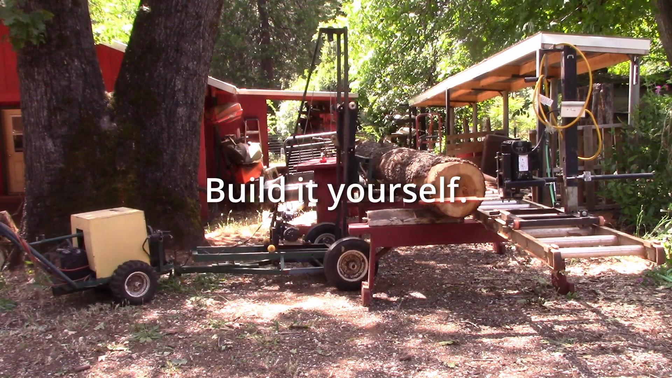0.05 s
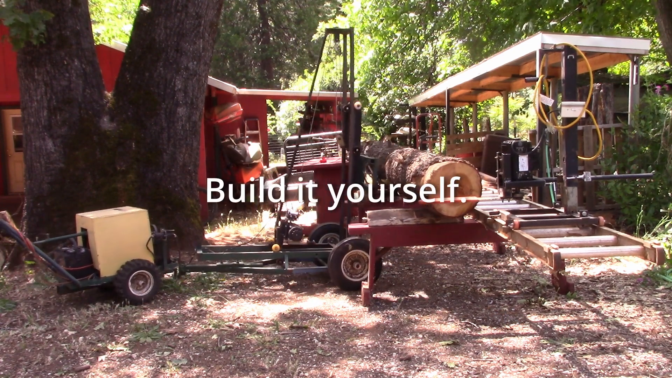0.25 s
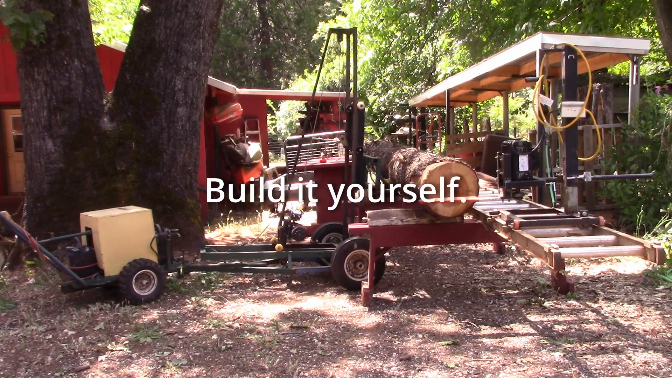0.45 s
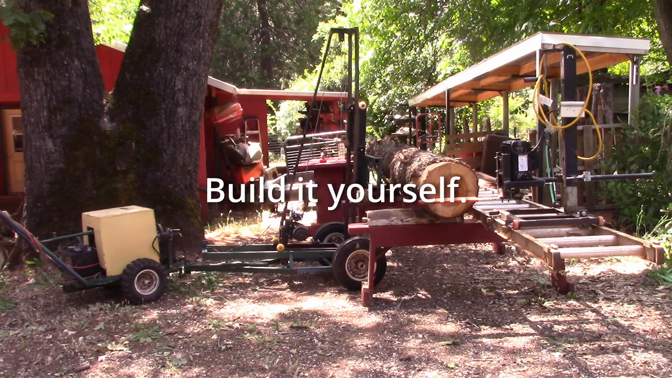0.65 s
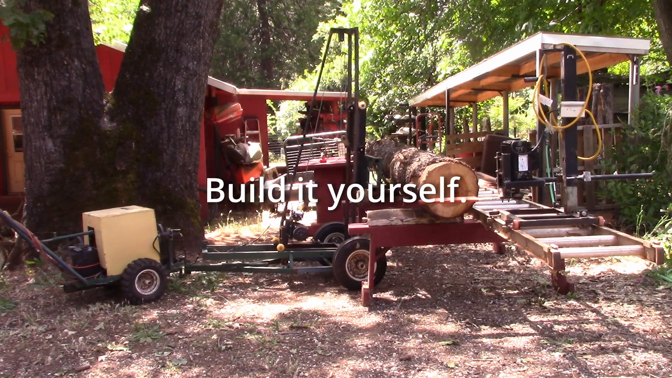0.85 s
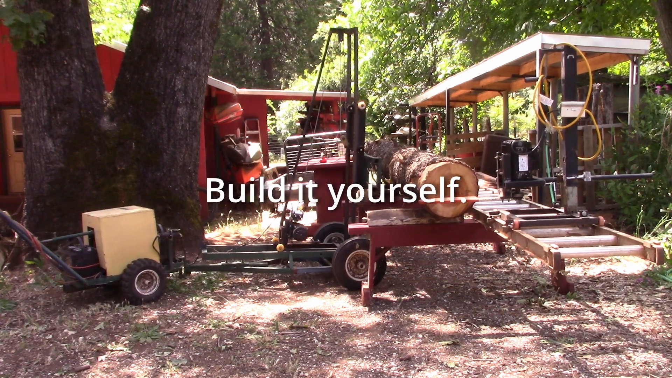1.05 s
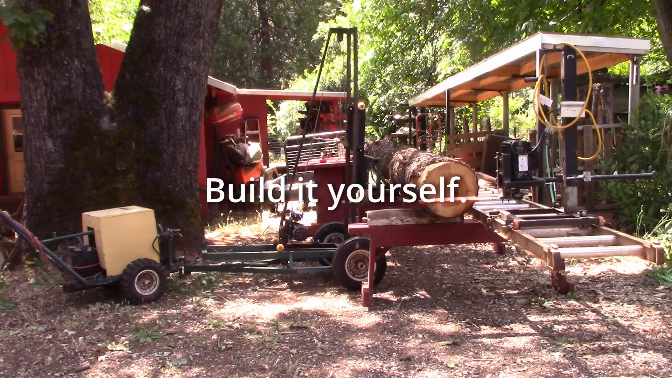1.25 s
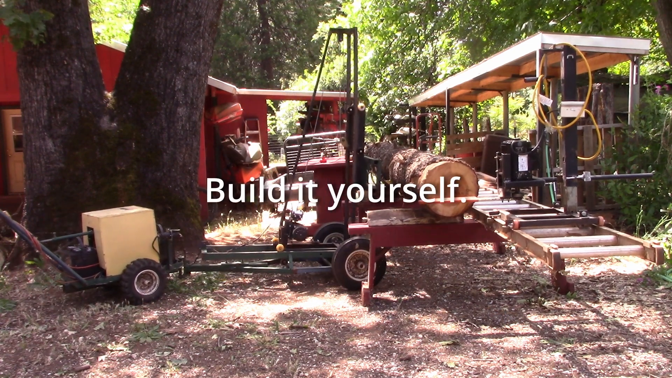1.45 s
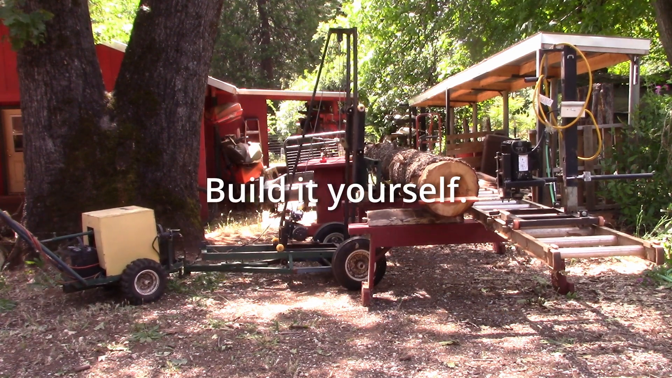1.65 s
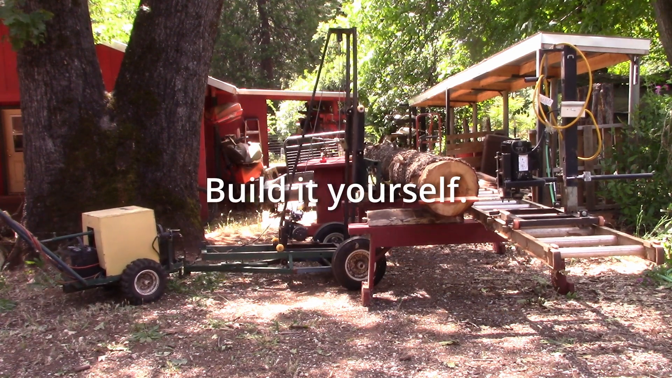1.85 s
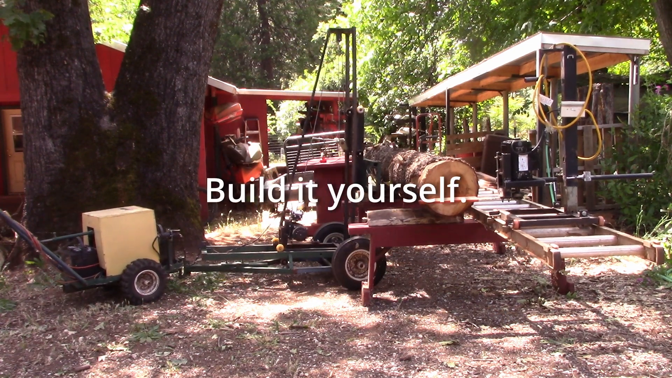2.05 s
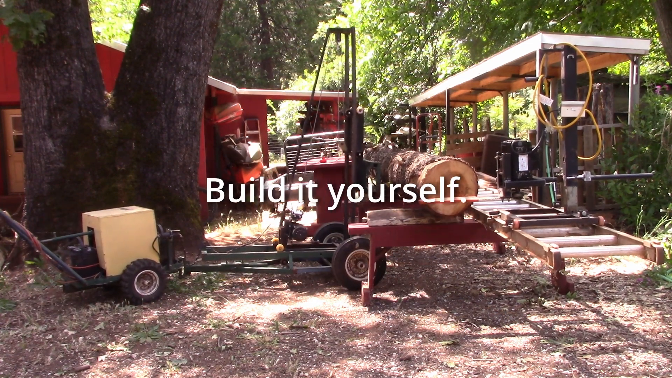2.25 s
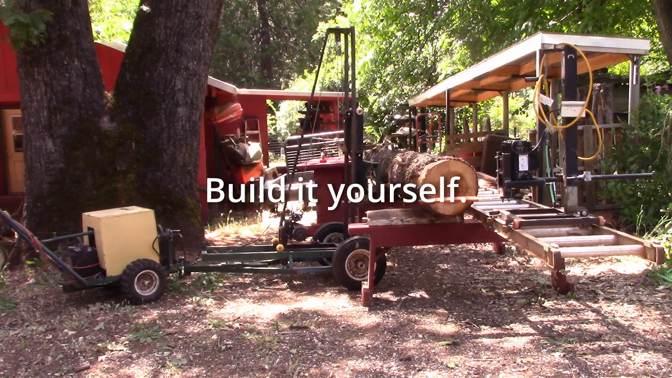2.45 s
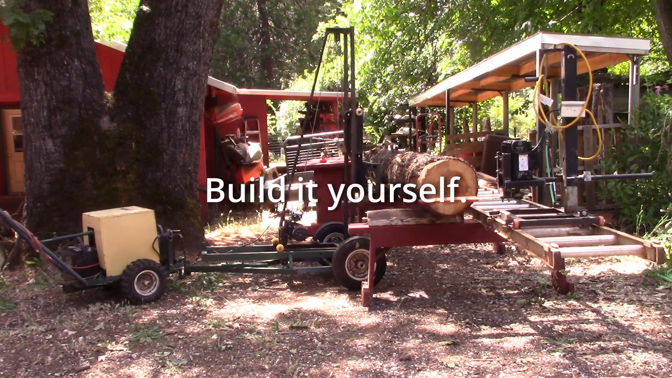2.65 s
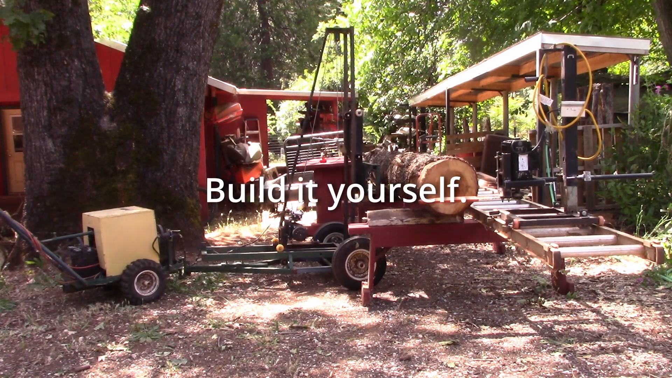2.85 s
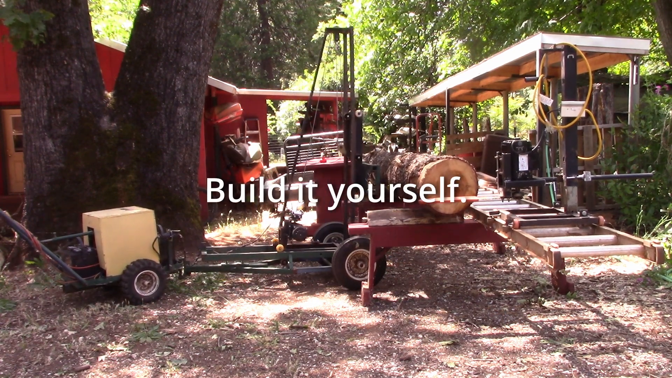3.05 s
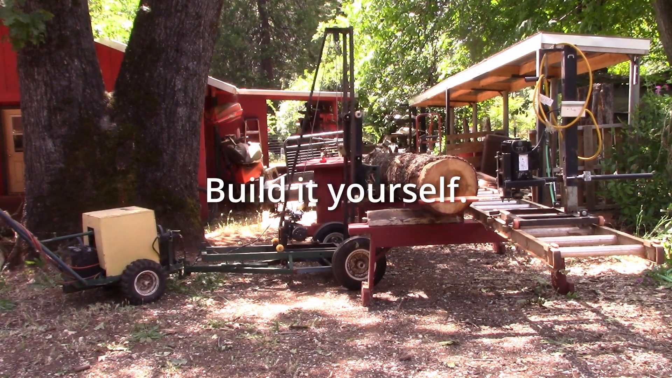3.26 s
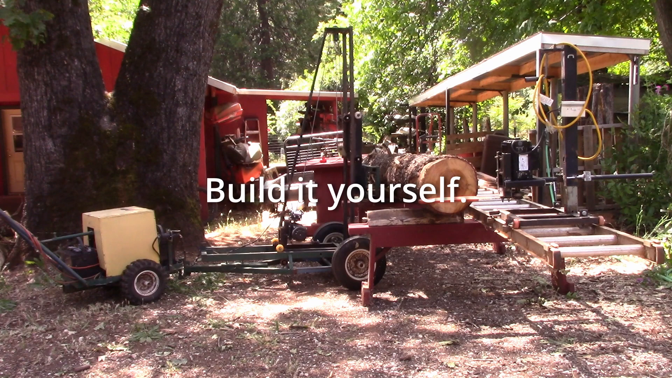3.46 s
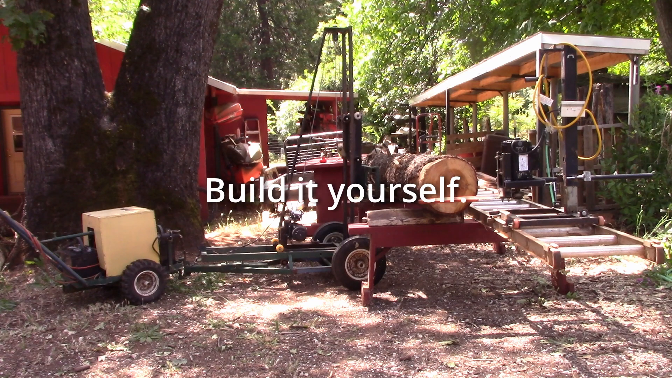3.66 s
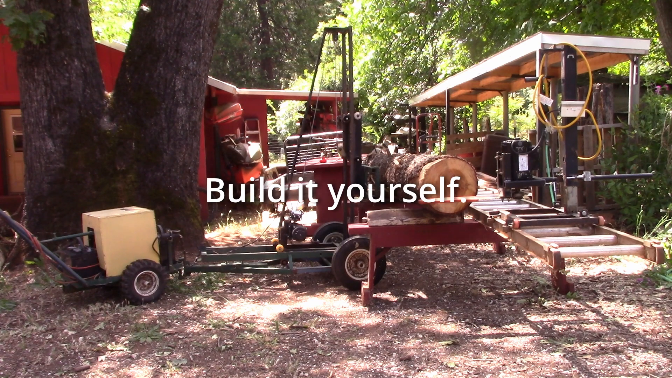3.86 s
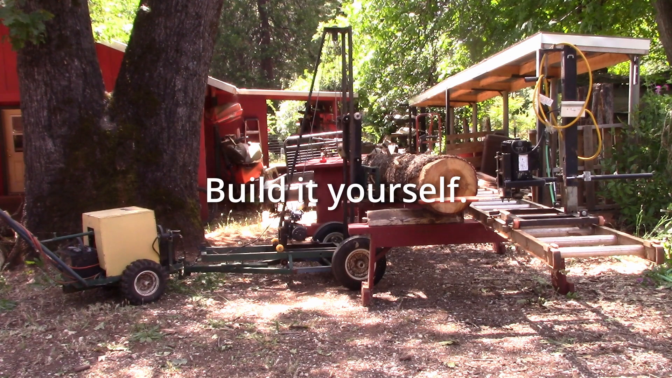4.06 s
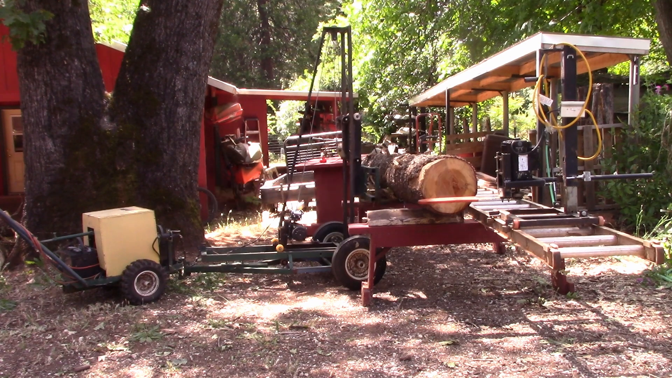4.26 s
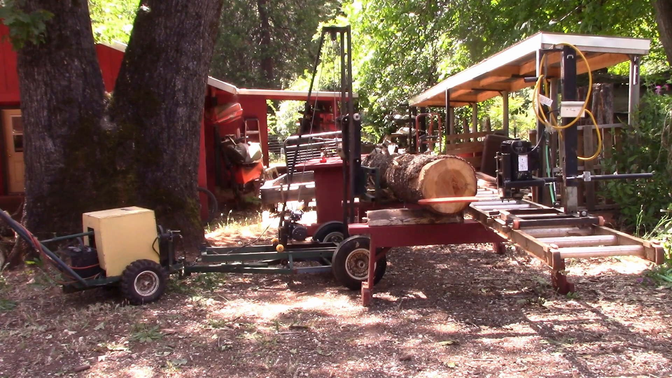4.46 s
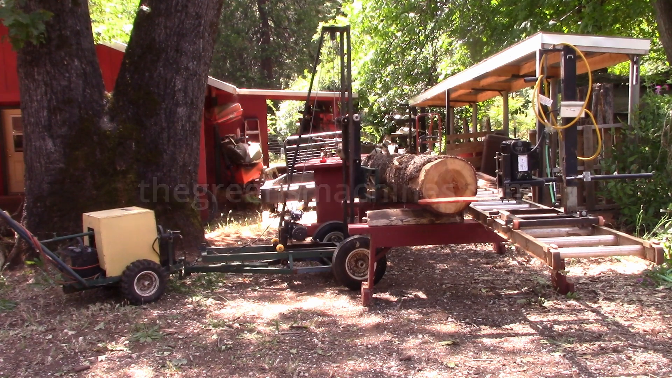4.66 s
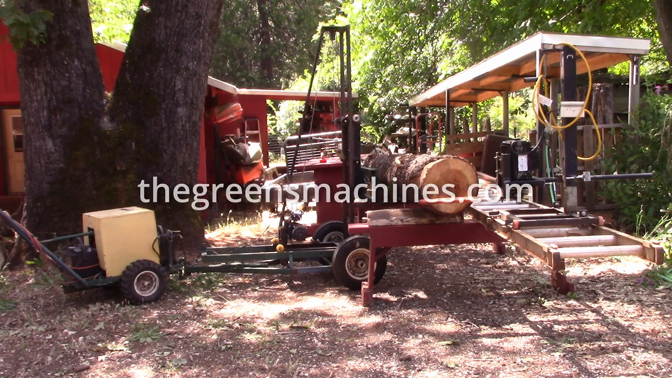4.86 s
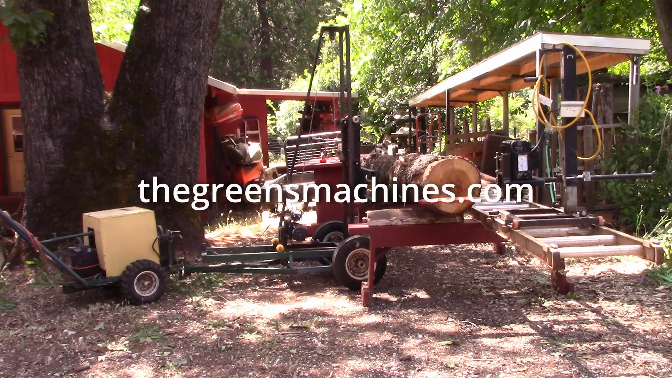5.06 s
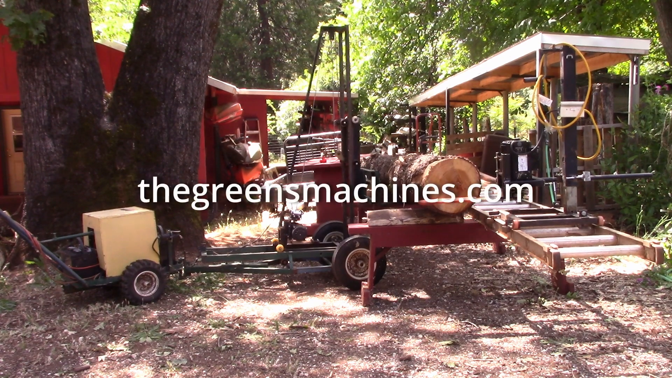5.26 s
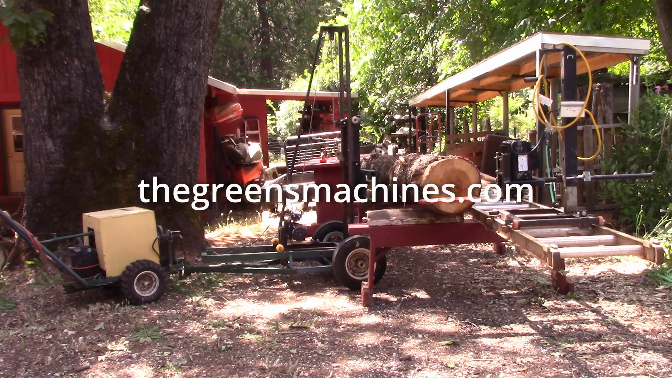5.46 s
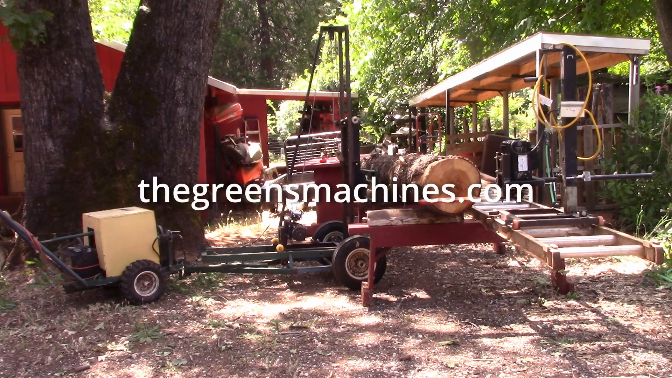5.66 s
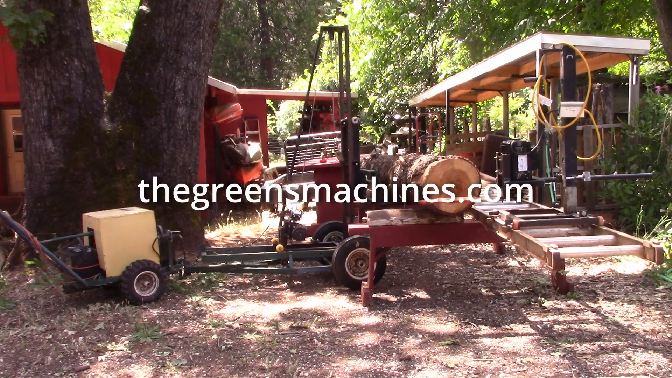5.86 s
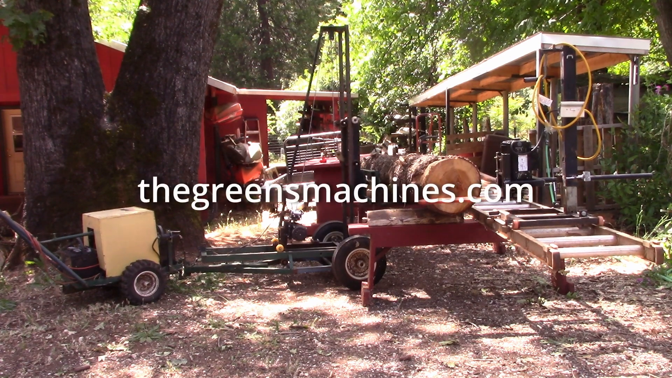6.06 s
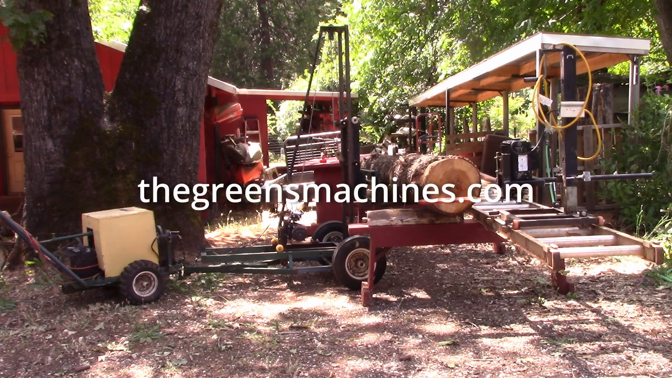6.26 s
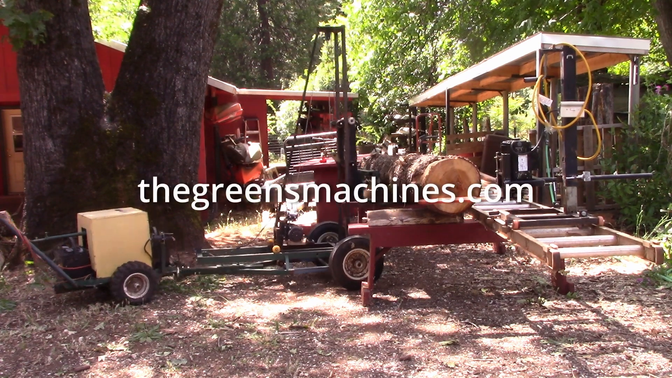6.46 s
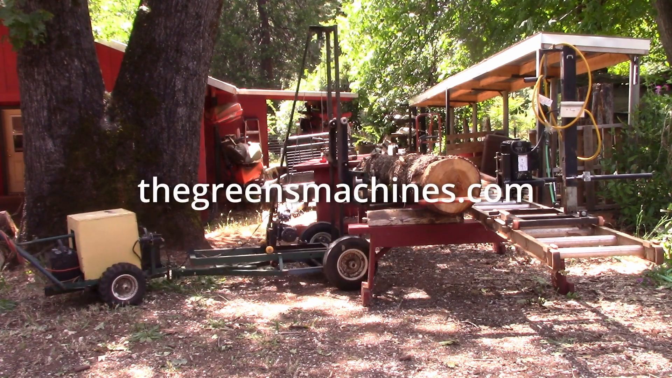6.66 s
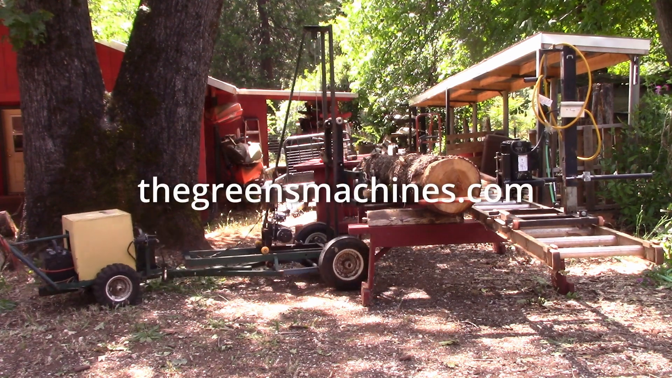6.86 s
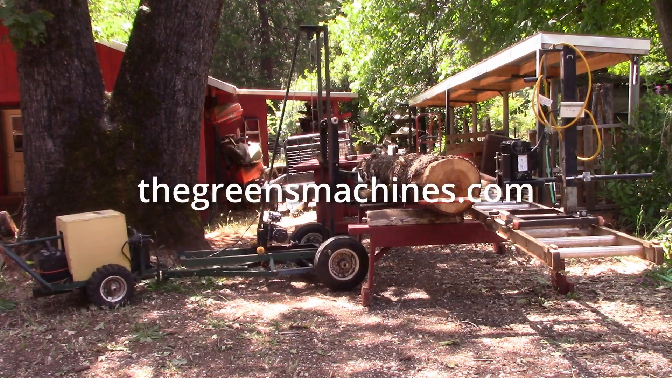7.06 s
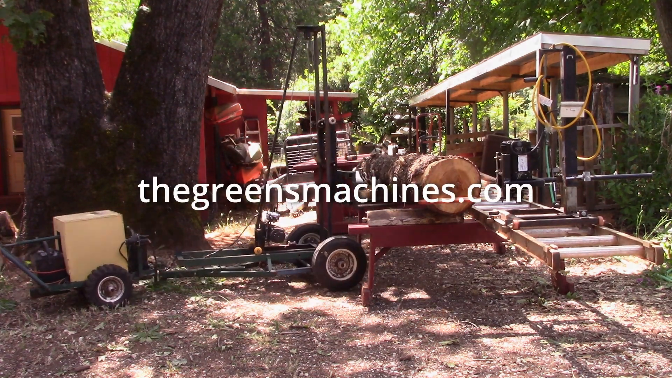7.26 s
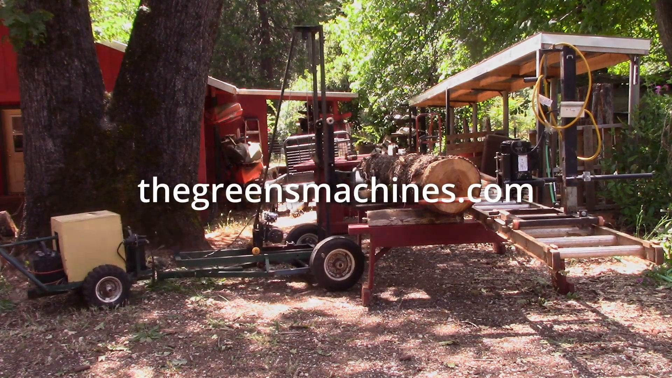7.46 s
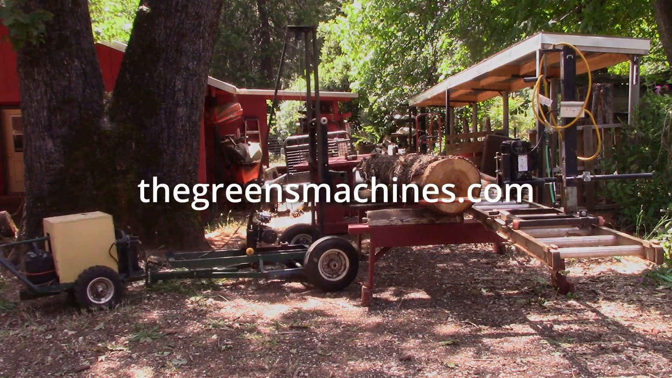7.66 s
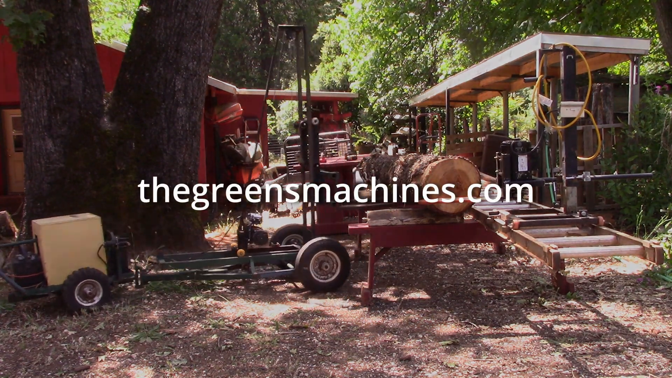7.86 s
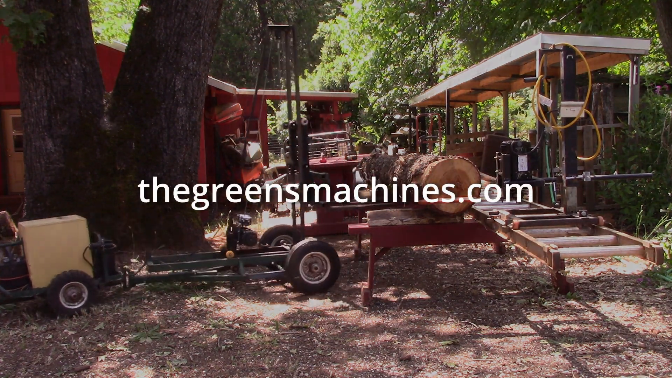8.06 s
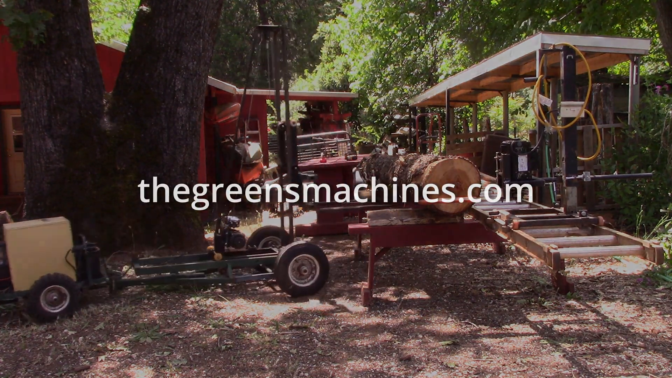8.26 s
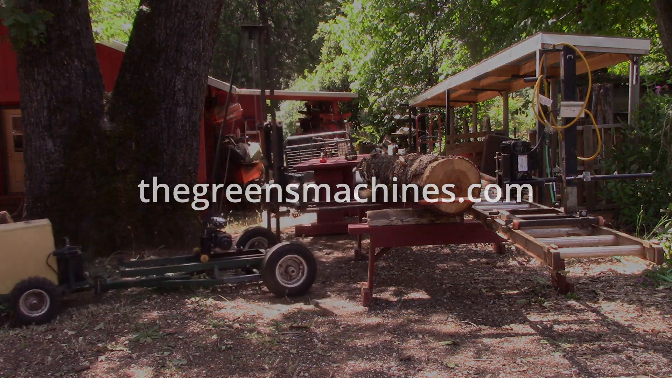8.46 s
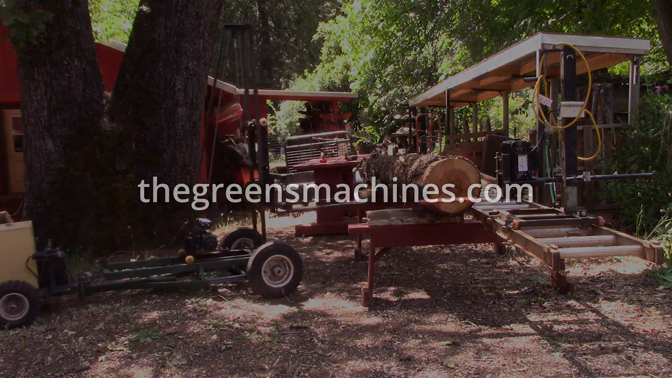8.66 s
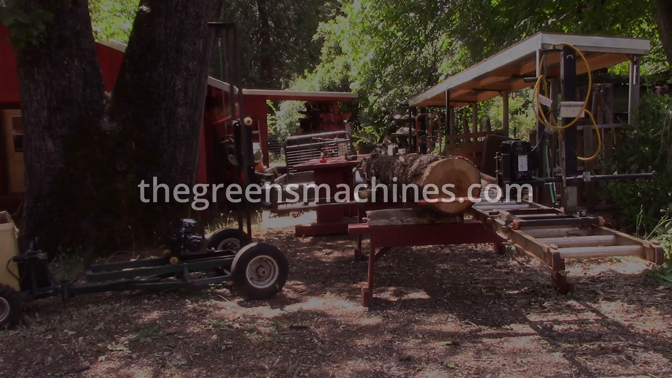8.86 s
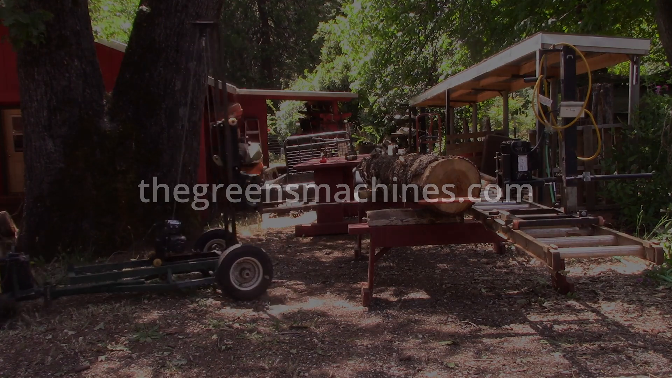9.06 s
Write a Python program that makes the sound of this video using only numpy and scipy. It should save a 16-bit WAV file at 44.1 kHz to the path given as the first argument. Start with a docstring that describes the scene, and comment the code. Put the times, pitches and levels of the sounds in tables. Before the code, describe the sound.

A small electric log carrier drones to a stop on crackling leaf litter a few metres away. Its lift runs twice with a rasping whine, among sharp little snaps and a few wooden bumps from the log. The brake clacks off, steel parts clatter loudly and the carrier backs away. After another clack it speeds up, its gears humming and hissing at a rising pitch. The yard is otherwise quiet.

```python
"""A wooded yard, an electric log carrier a few metres away. It rolls to a stop on crackling leaf
litter. The lift runs twice: strokes and rubbing ring its housing in a rasping whine, the log bumps.
The brake clacks off and the carrier backs away with a steel clatter, then speeds up. Its gear teeth
shake the frame and hiss; the shaft's tones sing out with speed."""
import sys
import numpy as np
from scipy import signal
from scipy.fft import rfft, irfft, next_fast_len
from scipy.io import wavfile
from scipy.ndimage import uniform_filter1d, map_coordinates

SR = 44100
rng = np.random.default_rng(int(sys.argv[2]) if len(sys.argv) > 2 else 0)


def log_audio(samples):
    """Write samples as a 16-bit WAV file to the path given in sys.argv[1]."""
    # one column per channel
    frames = np.atleast_2d(samples).T
    # limit to full scale, then quantise
    limited = np.clip(frames, -1, 1)
    pcm = np.round(limited * 32767).astype(np.int16)
    wavfile.write(sys.argv[1], SR, pcm)


N = 402175
TIME = np.arange(N) / SR
CRUISE_HZ = 300  # shaft speed

# frame resonances: pitch_hz, width_hz, level_db
FRAME_MODES = [(201, 27.6, -9), (223.5, 29, -2), (267.5, 22, -0.5), (403.7, 50.6, 2), (441, 146, -10.5),
               (514.4, 72, -2.5), (584, 175, -8.5), (678, 40, -8), (880, 68, -14), (1013, 78, -14.5),
               (1253, 300, -21)]
# spectrum of a small dry crack: freq_hz, level_db
CRACK_SPECTRUM = [(800, 7), (2500, 10), (6000, 2), (9500, 1.5), (12000, -14), (15500, -15)]


def amp(db):
    """Decibels to gain."""
    return 10 ** (np.asarray(db) / 20)


def unit(x):
    """Scales to rms 1."""
    return x / np.sqrt(np.mean(x ** 2) + 1e-20)


def bell(x, centre, span):
    """Smooth hump of height 1."""
    return np.exp(-((x - centre) / span) ** 2)


def add(mix, start_s, sound):
    """Lays a sound into the mix."""
    part = mix[max(round(start_s * SR), 0):][:len(sound)]
    part += sound[:len(part)]


def colour(x, spectrum):
    """Filters by (freq_hz, level_db) points, falling away past the ends; rms 1."""
    size = next_fast_len(len(x))
    octave = np.log2(np.fft.rfftfreq(size, 1 / SR) + 1)
    hz, db = np.transpose(spectrum)
    outside_oct = abs(octave - np.clip(octave, np.log2(hz[0]), np.log2(hz[-1])))
    gain = amp(np.interp(octave, np.log2(hz), db) - 6.9 * outside_oct)
    return unit(irfft(rfft(x, size) * gain, size)[:len(x)])


def drift(rate_hz):
    """Smooth random motion up to about rate_hz; rms 1."""
    size = next_fast_len(N)
    hz = np.fft.rfftfreq(size, 1 / SR)
    return unit(irfft(rfft(rng.standard_normal(size)) * np.exp(-(hz / rate_hz) ** 2), size)[:N])


def ring(x, modes):
    """Steep resonances (pitch_hz, width_hz, level_db) that ring on after each push; rms 1."""
    size = next_fast_len(N)
    freq_hz = abs(np.fft.fftfreq(size, 1 / SR))
    power = sum(amp(2 * db) / (1 + (2 * (freq_hz - hz) / width_hz) ** 2) ** 2
                for hz, width_hz, db in modes)
    minimum_phase = np.exp(signal.hilbert(np.log(power + 1e-12) / 2).conj())
    return unit(np.fft.ifft(np.fft.fft(x, size) * minimum_phase).real[:N])


def grains(per_s, spread_db):
    """Random impacts of uneven size; rms 1."""
    size = amp(spread_db * np.minimum(rng.exponential(1, N), 4))
    return unit(size * rng.choice([-1, 1], N) * (rng.random(N) < per_s / SR))


def burst(spectrum, t60_s, rise_s, tail_db, tail_t60_s, chatter_db=0):
    """Struck body with dense modes: a quick ring and a weaker, longer one."""
    t = np.arange(SR) / SR
    chatter = unit(amp(chatter_db * unit(uniform_filter1d(rng.standard_normal(SR), size=120))))
    decay = chatter * amp(-60 * t / t60_s) + amp(tail_db - 60 * t / tail_t60_s)
    return colour(rng.standard_normal(SR), spectrum) * decay * (1 - np.exp(-t / rise_s))


def chime(modes, rise_s=0.0015):
    """Struck metal: each mode dies at its own rate."""
    t = np.arange(SR) / SR
    tones = sum(amp(db - 60 * t / t60_s) * np.sin(2 * np.pi * (hz * t + rng.random()))
                for hz, db, t60_s in modes)
    return tones * (1 - np.exp(-t / rise_s))


def swell(start_s, stop_s, db, rise_s, fall_db_per_s=215):
    """Gain that rises, holds and runs down."""
    rise = np.clip((TIME - start_s) / rise_s, 0, 1)
    return rise * amp(db - fall_db_per_s * np.maximum(TIME - stop_s, 0))


def by_speed(speed_hz, knee_hz, knee_db, db_per_hz):
    """Gain against shaft speed, with slopes (below, above) the knee."""
    return amp(knee_db + np.where(speed_hz < knee_hz, *db_per_hz) * (speed_hz - knee_hz))


def shaft_speed_hz():
    """Drive motor speed; zero while the lift works."""
    # three moves: time_s, speed_hz
    roll_in = [(0, 229), (.28, 221.1), (.5, 173), (.62, 135), (.75, 103), (.92, 40.13)]
    back_off = [(6.11, 60), (6.159, 188.2), (6.22, 226), (6.5, 240), (6.721, 232), (6.92, 205), (7.15, 198),
                (7.35, 150)]
    drive_off = [(7.42, 172), (7.5, 219), (7.8, 246.8), (8.1, 283.2), (8.2, 303.5), (8.4, 320.8),
                 (8.6, 326.3), (8.8, 332.6), (9.12, 338)]
    arriving = np.interp(TIME, *np.transpose(roll_in), right=0)
    leaving = np.interp(TIME, *np.transpose(back_off + drive_off), left=0)
    return arriving + leaving


def forest_air():
    """Still air, barely stirring."""
    # air spectrum: freq_hz, level_db
    spectrum = [(15, -66), (25, -47), (49, -19), (69, -5.5), (86, -33), (110, -4), (183, -5.5), (215, 1.5),
                (274, -5.5), (313, -6), (421, -5), (4500, -24), (5140, -24.5), (10900, -35), (15500, -43)]
    stir = amp(0.7 * drift(2))
    return amp(-63) * colour(rng.standard_normal(N), spectrum) * stir


def yard_echoes(x, t60_s):
    """Scattered echoes from trunks and sheds."""
    t = np.arange(SR // 2) / SR
    taps = rng.standard_normal(len(t)) * (rng.random(len(t)) < 2000 / SR)
    taps *= (t > 0.008) * amp(-60 * t / t60_s)
    taps = colour(taps, [(100, -33), (450, -2.5), (2000, 6), (4000, 11.5), (8000, 5), (15000, -43)])
    return signal.fftconvolve(x, taps / np.linalg.norm(taps))[:N]


def panels(x, echo_db, t60_s, count=40):
    """Short reflections in the frame comb the sound; thin steel returns only treble."""
    delay_s = rng.uniform(0.002, 0.05, count)
    taps = np.zeros(SR // 8)
    taps[(delay_s * SR).astype(int)] = rng.choice([-1, 1], count) * amp(-60 * delay_s / t60_s)
    highpass = signal.butter(2, 2200, "high", fs=SR, output="sos")
    taps = signal.sosfilt(highpass, taps / np.linalg.norm(taps))
    return x + amp(echo_db) * signal.fftconvolve(x, taps)[:N]


def ground_thuds():
    """Soft thuds through the ground."""
    # thuds: start_s, level_db, t60_s
    thuds = [(0.625, -56.5, 0.37), (0.787, -53, 0.069), (0.881, -57, 0.091), (.903, -54, 0.085),
             (1.277, -61, 0.14), (2.57, -61, 0.11), (2.749, -62, 0.12), (6.315, -54, 0.065),
             (6.589, -58, 0.47)]
    # ground spectrum: freq_hz, level_db
    ground = [(20, -50), (55, -13), (105, 3.5), (170, -4.5), (280, -4), (450, -33)]
    out = np.zeros(N)
    for start_s, db, t60_s in thuds:
        add(out, start_s, amp(db) * burst(ground, t60_s, rise_s=0.0029, tail_db=-9, tail_t60_s=1))
    return out


def twigs(speed_hz, cruise_per_s=7, shapes=6):
    """Twigs and bark snap; litter crackles under the tyres, denser and harder with speed."""
    # loudest snaps: start_s, level_db
    snaps = [(0.071, -45), (.091, -45), (.115, -51), (.198, -50.5), (.26, -52), (.301, -52), (.368, -48),
             (0.4426, -51), (.455, -48.5), (0.6127, -51), (1.627, -40), (2.815, -39.5), (2.894, -37.5),
             (2.9437, -38), (3.033, -38.5), (3.953, -52), (4.067, -47), (4.3412, -42), (4.7665, -43),
             (5.068, -36), (5.297, -40), (5.457, -38.5)]
    effort = (speed_hz / CRUISE_HZ) ** 4
    hit = rng.random(N) < cruise_per_s * effort / SR
    crackles = list(zip(TIME[hit], -47.5 + 10 * np.log10(effort[hit])))
    clicks = np.zeros((shapes, N))
    for k, (start_s, db) in enumerate(snaps + crackles):
        add(clicks[k % shapes], start_s, amp([db - 2]))
    out = np.zeros(N)
    for row in clicks:
        crack = burst(CRACK_SPECTRUM, t60_s=0.011, rise_s=0.00029,
                      tail_db=-11.5, tail_t60_s=0.11, chatter_db=1.8)
        out += signal.oaconvolve(row, crack)[:N]
    return out


def log_bumps():
    """The log bumps its bed; soft bumps are dull."""
    # bumps: start_s, level_db, t60_s, cutoff_hz
    bumps = [(0.929, -60, 0.15, 1000), (0.955, -50, 0.054, 1300), (2.471, -46, 0.18, 6000),
             (5.068, -46, 0.071, 5900), (5.332, -39, 0.14, 5000), (5.366, -47.5, 0.18, 6000),
             (6.314, -36, 0.022, 4000)]
    # wood spectrum: freq_hz, level_db
    wood = [(130, -16), (250, -8), (390, 6), (620, -3.5), (800, 1), (1450, -2), (2300, -7), (3100, -6.5),
            (5200, -24), (9000, -41)]
    out = np.zeros(N)
    for start_s, db, t60_s, cutoff_hz in bumps:
        dulled = [(hz, band_db - 10 * np.log10(1 + (hz / cutoff_hz) ** 6)) for hz, band_db in wood]
        add(out, start_s, amp(db) * burst(dulled, t60_s, rise_s=0.0017, tail_db=-10, tail_t60_s=0.76))
    return out


def linkage_clinks():
    """The brake and lift linkage rings as it takes up slack."""
    # linkage modes: pitch_hz, level_db, t60_s
    modes = [(1990, -2, .045), (2180, 7, 0.048), (2560, 8, 0.043), (2870, -3, 0.037), (2926, 7, 0.054),
             (3125, 5.5, 0.062), (3400, -4, .035), (4830, -7, 0.078)]
    # clinks: start_s, level_db
    clinks = [(0.086, -64), (.301, -64), (1.627, -47), (5.33, -39), (6.087, -45), (6.295, -56),
              (6.314, -46.5), (6.368, -49), (6.47, -50), (7.372, -50)]
    out = np.zeros(N)
    for start_s, db in clinks:
        add(out, start_s, amp(db) * chime(modes))
    return out


def brake():
    """The brake clacks off."""
    # releases: start_s, level_db
    releases = [(6.0845, -30), (7.370, -30.5)]
    # clack spectrum: freq_hz, level_db
    spectrum = [(530, -55), (900, -8), (1350, 7), (2310, 9.5), (2960, 14.5), (4330, 7), (6350, 5.5),
                (7320, -0.5), (10500, 1.5), (11800, -11), (15500, -14)]
    out = np.zeros(N)
    for start_s, db in releases:
        clack = burst(spectrum, t60_s=0.034, rise_s=0.0036, tail_db=-26.5, tail_t60_s=0.55)
        add(out, start_s, amp(db + 7) * clack)
    return out


def frame_jolts(db_per_oct=-33):
    """The frame booms at each jolt, most near the jolt's pitch."""
    # jolts: start_s, level_db, pitch_hz
    jolts = [(6.3141, -31.5, 265), (7.725, -33, 210)]
    out = np.zeros(N)
    for start_s, db, pitch_hz in jolts:
        modes = [(hz, mode_db + db_per_oct * abs(np.log2(hz / pitch_hz)),
                  np.log(1000) / (np.pi * width_hz)) for hz, width_hz, mode_db in FRAME_MODES]
        add(out, start_s, amp(db) * chime(modes, rise_s=0.0022))
    return out


def strike_db(hz, pitch_hz, span_oct=0.48):
    """Where a part is struck favours the modes near one pitch."""
    return 5 * bell(np.log2(hz / pitch_hz), 0, span_oct)


def steel_clatter():
    """Steel parts strike: a crack of contact, a chattering crash, ringing modes."""
    # blows: start_s, level_db, t60_s, pitch_hz
    blows = [(0.082, -47.5, 0.074, 3500), (0.353, -50, 0.074, 4570), (1.626, -35.5, 0.08, 3740),
             (5.331, -42.5, .07, 4400), (6.295, -41.5, 0.042, 2530), (6.313, -44, 0.033, 2900),
             (6.367, -46, 0.086, 3000), (6.395, -45, .04, 1600), (6.469, -44, 0.06, 3500),
             (6.482, -41.5, 0.043, 3200), (6.5214, -31, 0.27, 4600), (6.523, -34.5, 0.33, 1480),
             (6.562, -26.5, 0.2, 3470), (6.576, -28.5, .16, 3800), (6.592, -27.5, 0.27, 4750),
             (6.609, -23.5, 0.12, 5750), (6.6141, -23, 0.041, 4660), (6.6224, -31.5, 0.17, 1150),
             (6.638, -32.5, 0.24, 5500), (6.656, -40, 0.45, 3400)]
    # crash spectrum: freq_hz, level_db
    steel = [(350, -48), (600, -1), (726, -11), (798, 4.5), (979, -3), (1150, 1.5), (1250, -5), (1450, 3.5),
             (1930, -5), (2790, -4.5), (3470, 0.5), (4750, -5.5), (5900, -8), (7540, -12.5), (9300, -12.5),
             (11300, -24), (12500, -33), (15500, -43)]
    # steel frame modes: pitch_hz, level_db, t60_s
    modes = [(1150, -6, 0.17), (1340, -5, 0.26), (1520, -9, 0.25), (2640, -4.5, 0.41), (3080, -3.5, 0.23),
             (3368, 0, 0.26), (3390, -7, .25), (3650, -9, 0.24), (3822, -10, 0.25), (4020, -7, 0.28),
             (4200, -4, .35), (4620, -1, 0.29), (4676, -3, 0.27), (4900, -7, 0.26), (6070, -5, .25),
             (6250, -12, .27), (9500, -14, 0.25)]
    contact = [(1500, 0), (6000, 0), (11000, -6), (15500, -15)]  # freq_hz, level_db
    out = np.zeros(N)
    for start_s, db, t60_s, pitch_hz in blows:
        spectrum = [(hz, band_db + strike_db(hz, pitch_hz)) for hz, band_db in steel]
        crash = burst(spectrum, t60_s, rise_s=0.00075, tail_db=-23.5, tail_t60_s=1, chatter_db=1.4)
        ringing = chime([(hz, mode_db + strike_db(hz, pitch_hz), ring_s)
                         for hz, mode_db, ring_s in modes])
        ringing *= min(t60_s / 0.22, 1)  # damped blows ring the frame less
        crack = burst(contact, t60_s=0.0084, rise_s=0.00018, tail_db=-39, tail_t60_s=0.1)
        add(out, start_s, amp(db - 1.5) * (crash + amp(-7.5) * crack + amp(-12) * ringing))
    return out


def pivots():
    """Dry pivots give brief, thin, high scrapes."""
    # scrapes: centre_s, half_length_s, level_db
    scrapes = [(4.737, 0.013, -62), (4.866, 0.013, -58), (4.914, 0.011, -56), (5.008, 0.037, -66),
               (5.26, 0.011, -55), (5.345, 0.03, -60), (5.477, 0.062, -63), (6.72, 0.049, -71),
               (7.724, .03, -64), (8.93, 0.031, -63)]
    # scrape spectrum: freq_hz, level_db
    spectrum = [(5000, 0), (7500, -5.5), (8400, 2), (9000, -4), (9550, 3.5), (10100, -14), (12000, -18),
                (14000, -22), (15500, -30)]
    envelope = sum(amp(db) * bell(TIME, centre_s, half_s) for centre_s, half_s, db in scrapes)
    return colour(grains(3000, 1.5), spectrum) * envelope


def lift_hum():
    """The lift motor hums as it takes the log's weight."""
    # motor tones: pitch_hz, level_db
    tones = [(425.4, 0), (594, -8), (2008, -1)]
    # hum envelope: time_s, level_db
    envelope = [(1.04, -73), (1.4, -67), (1.9, -55.5), (2.6, -53.5), (3.15, -54.5), (3.45, -60),
                (3.68, -59), (3.9, -130)]
    clock_s = np.cumsum(1 + 0.0034 * drift(12)) / SR
    hum = sum(amp(db) * (1 + 0.33 * drift(22)) * np.sin(2 * np.pi * hz * clock_s) for hz, db in tones)
    return amp(np.interp(TIME, *np.transpose(envelope))) * hum


def strokes(rate_hz, spread_db):
    """One blunt push a turn, uneven in time and strength."""
    turns = np.cumsum(rate_hz * (1 + 0.16 * drift(40))) / SR
    strength = amp(spread_db * np.clip(rng.standard_normal(N), -2, 1))
    pushes = np.diff(np.floor(turns), prepend=0) * strength
    return colour(pushes, [(800, -2), (1800, 0), (2600, -7), (4500, -10), (12000, -22)])


def lift():
    """Strokes and rubbing ring the housing; under load it turns slower, rasps and strains more."""
    # runs: start_s, stop_s, level_db, stroke_hz, rasp_db, strain_db, pitch_ratio
    runs = [(1.04, 3.64, -44.5, 56, -7.5, -14, 1.001), (3.947, 5.455, -46, 72, -10.5, -24, 0.995)]
    # housing resonances, overtones under load: pitch_hz, width_hz, level_db
    housing = [(1741, 136, 3.5), (1642, 275, -4.5), (2130, 205, -7.5), (2820, 530, -19), (4140, 220, -22.5),
               (5780, 380, -29), (8300, 840, -30.5), (9470, 220, -26.5)]
    strain_modes = [(2610, 130, -5), (2980, 290, 1), (3530, 110, -1), (4120, 170, -4.5), (4480, 180, -.5)]
    # dry rasp: freq_hz, level_db
    rasp_spectrum = [(190, -13), (400, -0.5), (700, -4), (1200, -4), (2800, -1), (3280, -9), (3800, -3),
                     (4500, -10), (5400, -16.5), (6050, -8), (7200, -17), (8300, -13.5), (9500, -19.5),
                     (9900, -23), (11500, -27.5), (12200, -35), (15500, -41)]
    # surges and sags of the whine: time_s, level_db
    surges = [(1.18, -1), (1.23, -3), (1.3, 3), (1.43, -3), (1.48, 2.0), (1.5, -2), (1.88, 1.5),
              (1.93, -2.0), (1.98, 1.5), (2.45, -2), (2.48, 0.5), (2.78, 1.0), (2.83, -4.5), (2.9, 0.5),
              (3.1, -2.5), (3.15, 3.5), (3.2, 0.5), (3.62, 0.5), (4.08, -1), (4.15, -5), (4.2, 1.5),
              (4.35, -1.0), (4.5, 1.5), (4.6, -2.5), (4.68, 3.5), (4.83, -3.5), (4.88, 1.5), (4.93, -1.5),
              (5.08, 3.5), (5.25, -2.5), (5.3, 0)]
    rasp = colour(grains(7000, 1.3), rasp_spectrum) * amp(0.9 * drift(33))
    strain = ring(grains(900, 1), strain_modes)
    out = np.zeros(N)
    for start_s, stop_s, db, stroke_hz, rasp_db, strain_db, pitch_ratio in runs:
        pushes = amp(-13.5) * strokes(stroke_hz, spread_db=2.2)
        rubbing = grains(1200, 0.9)
        modes = [(hz * pitch_ratio, width_hz, mode_db) for hz, width_hz, mode_db in housing]
        whine = ring(pushes + rubbing, modes)
        wobble_s = 0.00008 * drift(16)  # drifting delay bends the pitch
        whine = map_coordinates(whine, [(TIME + wobble_s) * SR], order=3, mode="nearest")
        whine *= amp(np.interp(TIME, *np.transpose(surges)) - 0.3)
        running = whine + amp(rasp_db) * rasp + amp(strain_db) * strain
        out += swell(start_s, stop_s, db, rise_s=0.15) * running
    return out * amp(0.08 * drift(5.9))


def frame_drone(speed_hz, turns, singing):
    """Tooth impacts and slow gear tones shake the frame, in sympathy near one speed."""
    # gear tones: shaft_multiple, level_db
    gears = [(1.21, -18), (1.29, -15.5), (1.42, -9.5), (1.505, -12), (1.8, -7.5), (2.03, -9.5),
             (2.12, -8.5), (2.68, -7.5)]
    tones = sum(amp(db) * np.sin(2 * np.pi * k * turns + 0.5 * drift(32)) for k, db in gears)
    sympathy = amp(3.1 * bell(speed_hz, 292, 10))
    shaking = grains(9000, 0.4) + amp(-7) * singing ** 0.66 * sympathy * tones
    drone = colour(ring(shaking, FRAME_MODES), [(40, -14), (170, 3), (4000, -1)])
    return by_speed(speed_hz, knee_hz=245, knee_db=-38.5, db_per_hz=(0.19, -0.0277)) * drone


def gear_mesh(speed_hz, turns, singing):
    """Teeth hiss, uneven contact flutters the tones; litter crunches under the tyres, more with speed."""
    # hiss spectrum: freq_hz, level_db
    spectrum = [(440, -8.5), (750, 0), (1110, -2), (1290, -4), (1780, -6.5), (2290, -8.5), (3100, -6),
                (4260, -14.5), (4890, -13), (5480, -22), (6890, -19.5), (11700, -36), (15500, -47)]
    # motor tones: shaft_multiple, level_db, flutter_depth
    orders = [(3, -12, 0), (4, -1.5, 0.3), (5, -21, 0.1), (6, -27, .5), (7, -14, 0.9), (8, -15, .8),
              (9, -14.5, .8), (10, -21, .8), (11, -13, 0.9)]
    # fuzzy gear whistles: shaft_multiple, width_hz, level_db
    whistles = [(6.9, 110, -27), (11, 310, -16), (14.76, 210, -14), (20.8, 240, -15), (35.4, 300, -31)]
    scrape = (1 + 0.11 * np.cos(2 * np.pi * turns)) * grains(12000, 2.3)
    # the same teeth meet a turn later, gathering the hiss into partials
    last_turn = np.interp(turns - 1, turns, scrape)
    hiss = amp(-1.5) * colour(scrape + 0.35 * last_turn, spectrum)
    tones = sum(amp(db) * (1 + flutter * drift(30)) * np.cos(2 * np.pi * k * turns)
                for k, db, flutter in orders)
    tones += sum(amp(db) * drift(width_hz) * np.sin(2 * np.pi * k * turns + drift(width_hz))
                 for k, width_hz, db in whistles)
    impacts = grains(300, 1.6)
    tick = burst(CRACK_SPECTRUM, t60_s=0.011, rise_s=0.0003, tail_db=-17, tail_t60_s=0.079)
    rattle = colour(signal.oaconvolve(impacts, tick)[:N], spectrum)
    gain = by_speed(speed_hz, knee_hz=237.5, knee_db=-48, db_per_hz=(0.64, 0.047))
    return gain * (hiss + singing * tones) + amp(-66) * np.sqrt(speed_hz / CRUISE_HZ) * rattle


def tone_flares(turns):
    """Tones flare at set times, as if sweeping through frame or panel resonances."""
    # flares: centre_s, half_length_s, shaft_multiple, level_db
    flares = [(7.843, 0.031, 1.64, -38), (7.855, 0.052, 12.6, -50.5), (7.87, .06, 8.25, -52.5),
              (8.03, .1, 7.85, -52.5), (8.06, 0.045, 1.46, -44), (8.177, 0.17, 10.8, -50.5),
              (8.336, 0.035, 8, -51), (8.438, 0.08, 9, -57), (8.495, 0.051, 8, -47), (8.536, 0.11, 7, -49),
              (8.775, 0.032, 8, -50), (8.792, 0.097, 7, -48.5), (8.801, 0.099, 10, -56),
              (8.983, 0.11, 1.51, -41), (8.9, 0.055, 9, -49), (9.013, .04, 7, -56),
              (9.026, 0.057, 9, -47.5)]
    phase_rad = 2 * np.pi * turns + 0.15 * drift(70)
    tones = sum(amp(db) * bell(TIME, centre_s, half_s) * np.sin(k * phase_rad)
                for centre_s, half_s, k, db in flares)
    return tones * (1 + 0.35 * drift(50))


def drive(speed_hz):
    """One shaft turns all the gears; its tones stand out with speed."""
    # prominence of the tones: speed_hz, level_db
    prominence = [(250, -16), (280, -8), (320, -3)]
    turns = np.cumsum(speed_hz * (1 + 0.004 * drift(35))) / SR
    singing = amp(np.interp(speed_hz, *np.transpose(prominence)))
    drone = frame_drone(speed_hz, turns, singing)
    return drone + gear_mesh(speed_hz, turns, singing) + tone_flares(turns)


def scene():
    """Machine straight ahead; only the echoes and the low air have width."""
    speed_hz = shaft_speed_hz()
    near = drive(speed_hz)
    blows = brake() + frame_jolts() + linkage_clinks() + steel_clatter() + log_bumps() + ground_thuds()
    near += panels(blows + twigs(speed_hz), echo_db=-8, t60_s=0.042)
    near += panels(lift() + lift_hum() + pivots(), echo_db=-7, t60_s=0.13)
    near += forest_air()
    echoes = amp(-26.5) * yard_echoes(near, t60_s=0.21)
    low_air = amp(-74) * colour(rng.standard_normal(N), [(30, -7), (65, -11), (150, -3), (1000, -14.5)])
    wide = echoes + low_air
    return np.array([near + wide, amp(-0.4) * (near - wide)])


def record(dry):
    """Steep band limit."""
    lowpass = signal.firwin(511, cutoff=15800, window=("kaiser", 9), fs=SR)
    return signal.oaconvolve(dry, lowpass[None], "same")


dry = scene()
out = record(dry)
log_audio(out)
```